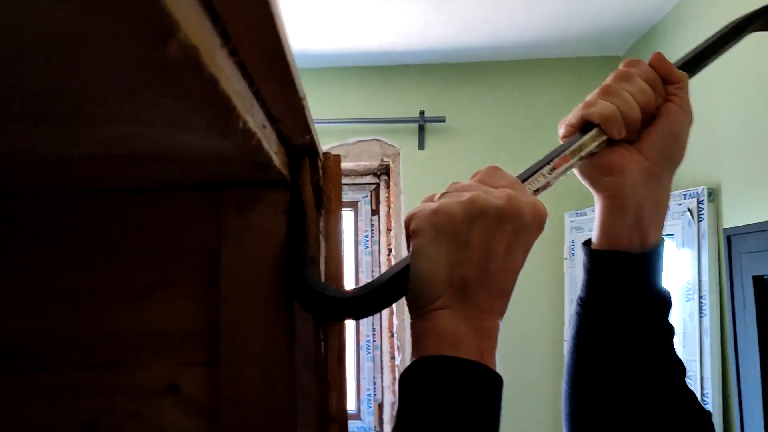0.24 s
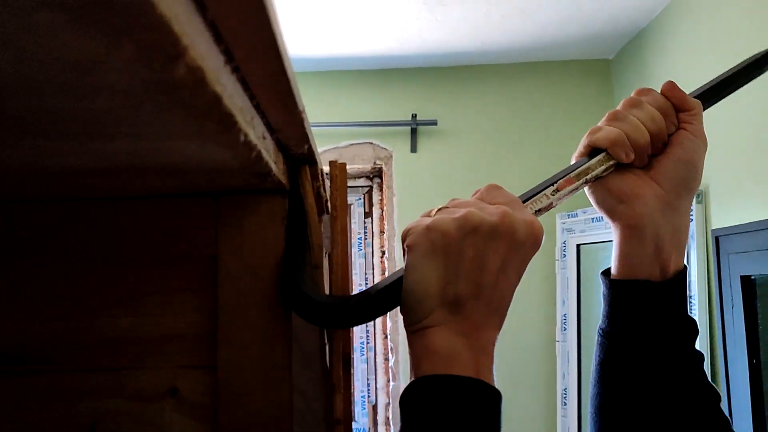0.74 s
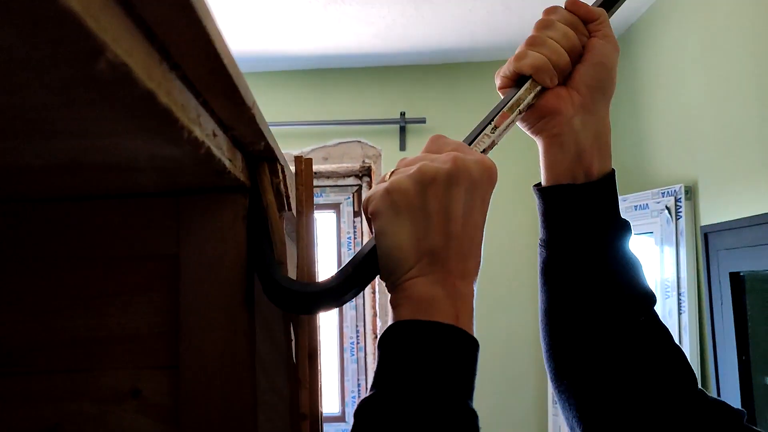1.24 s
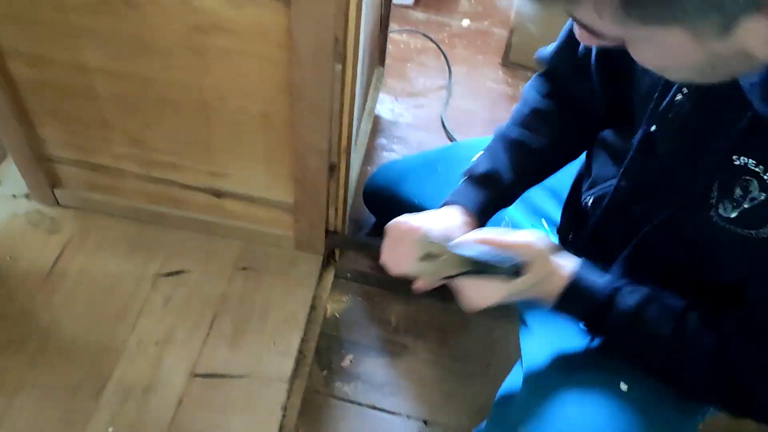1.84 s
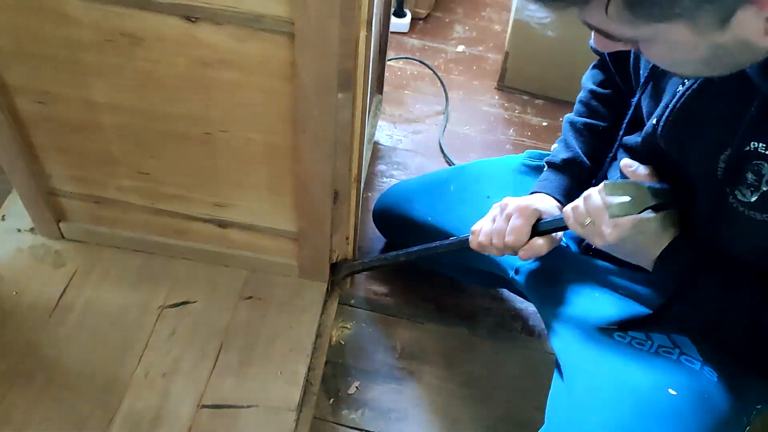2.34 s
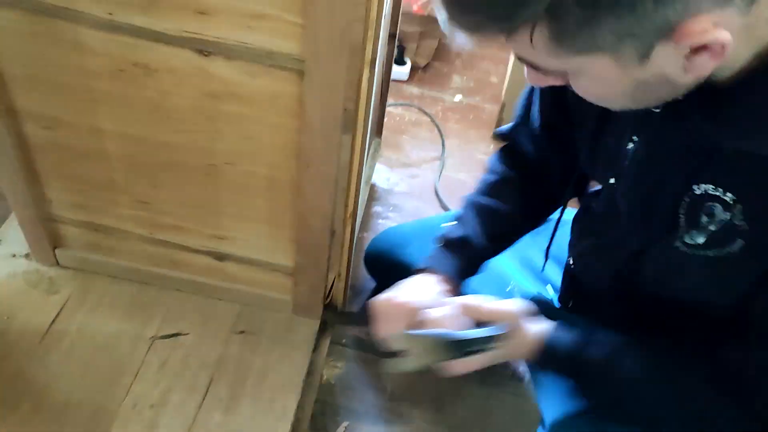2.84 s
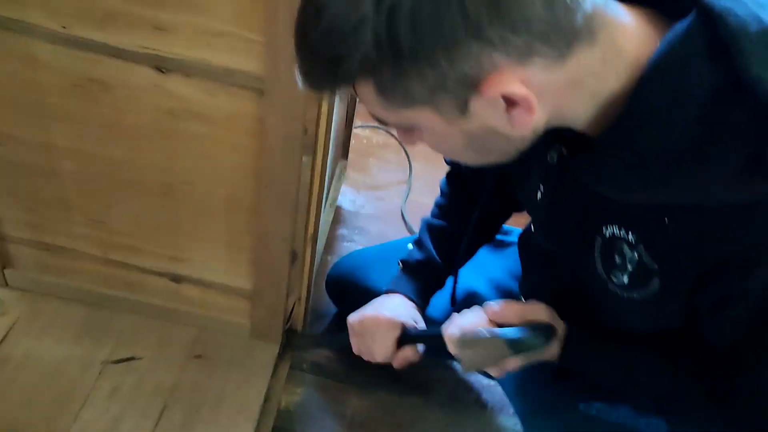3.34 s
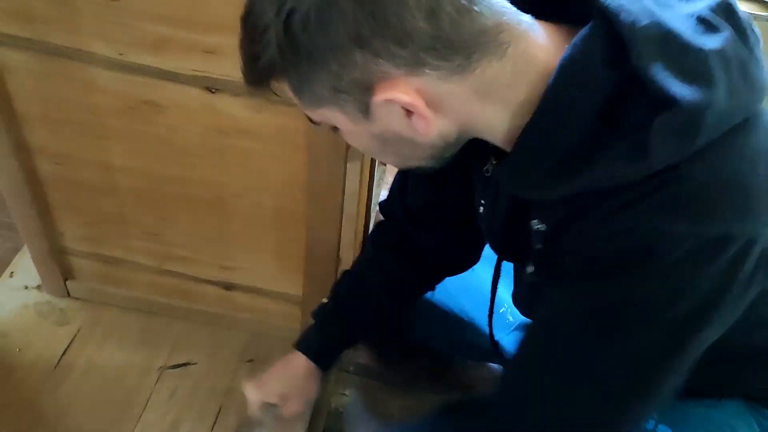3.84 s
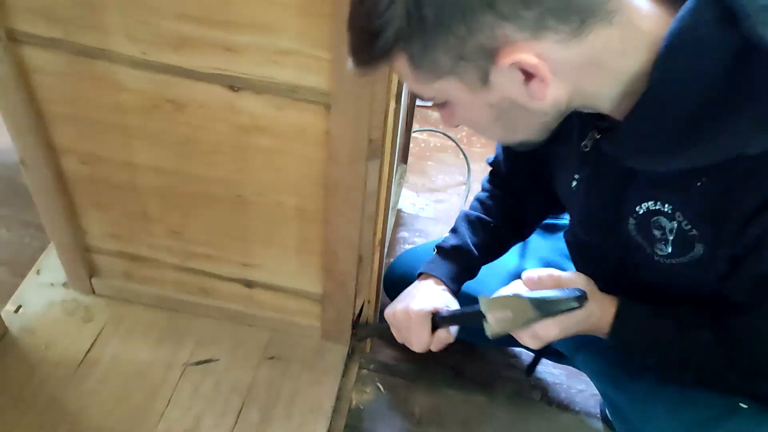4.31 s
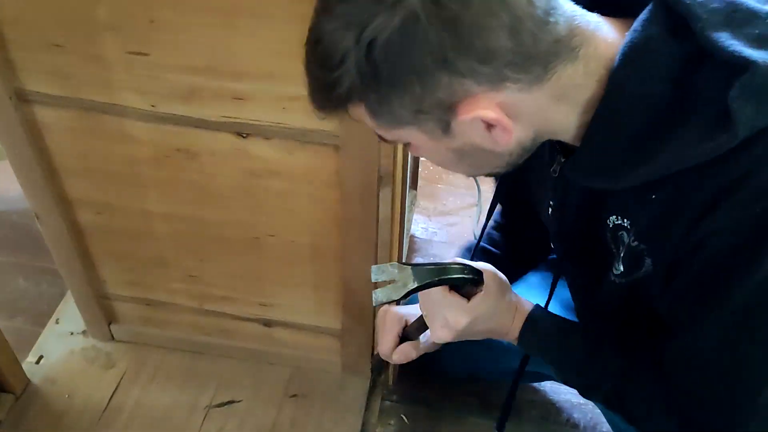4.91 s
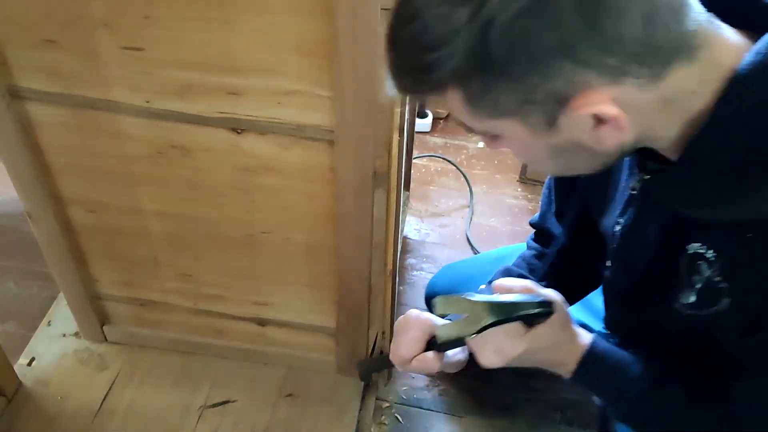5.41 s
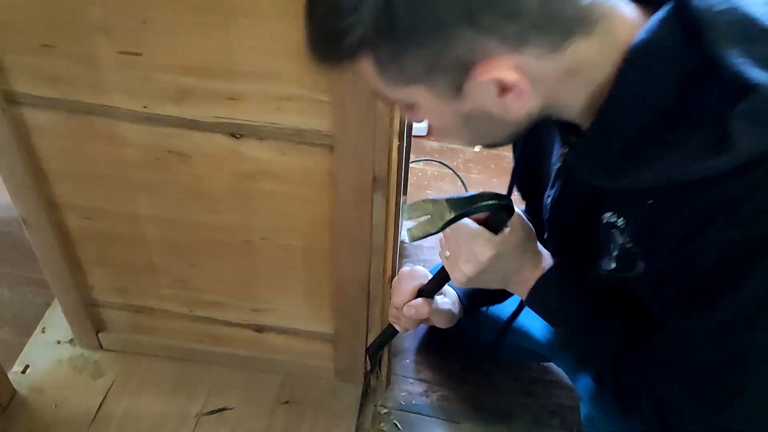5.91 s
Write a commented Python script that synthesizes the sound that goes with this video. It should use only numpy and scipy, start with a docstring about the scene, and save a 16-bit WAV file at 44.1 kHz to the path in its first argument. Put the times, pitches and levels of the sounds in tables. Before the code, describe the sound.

Close stereo pickup in a bare, lightly reverberant room, with faint hush and low handling rumble. A weak tick and a soft scrape at 0.15 s lead to loud, dry wood cracks from 0.3 to 0.8 s, bright and snapping with a short board ring. After a brief gap, a rapid softer creaking volley runs from 1.05 to 1.35 s. A short rasp follows at 1.45 s, then splintering swells into a strong crunch around 1.7 s and another at 2.05 s with a thud. Smaller crunches continue to 2.9 s, fading to sparse faint crackles until a sharp crunch and knock at 3.85 s. Dull knocks come near 4.2 and 4.3 s, with left-side microphone bumps at 4.3 and 4.5 s. A gritty crunch at 4.87 s precedes heavy hollow thuds at 5.17 and 5.43 s, then lighter knocks and scrapes to the end, about 6.1 s.

```python
"""Sharp cracks of an old wardrobe joint in a bare room, two scrapes among them, then mostly crunches and thuds.
A crowbar does the work: noise grains under event envelopes drive wood resonances or take a splinter colour.
Smooth contact pulses ring the carcass as thuds; something brushes the left microphone port.
Hands rumble on the support under a faint hush; decaying noise bands make the room, two ports pick it up."""
import sys
import numpy as np
from scipy import signal
from scipy.fft import rfft, irfft, next_fast_len
from scipy.io import wavfile

SR = 44100
rng = np.random.default_rng(int(sys.argv[2]) if len(sys.argv) > 2 else 0)


def wav_record(signal):
    """Record a signal, one row per channel, as 16-bit PCM in the file named by sys.argv[1]."""
    frames = np.transpose(np.atleast_2d(signal))
    bounded = np.clip(frames, -1, 1)
    # unit amplitude maps onto the largest positive 16-bit level
    quanta = np.round(bounded * 32767).astype(np.int16)
    wavfile.write(sys.argv[1], SR, quanta)


N = 271459

# Thin panel resonances: (frequency [Hz], width [Hz], relative level [dB])
PANEL_MODES = [(165, 35, -8), (267, 14, 2), (350, 25, -7), (440, 54, -2.5), (468, 35, 1), (577, 42, -4),
               (758, 260, -11)]
# Wardrobe carcass resonances: (frequency [Hz], width [Hz], relative level [dB])
CARCASS_MODES = [(117.3, 32, -4.5), (135, 24.8, 1), (163, 43.4, -1.5), (213.3, 49.3, -1), (258, 72.4, -2.5),
                 (350, 114, -8)]
# Spectrum of splintering wood: (frequency [Hz], relative level [dB])
SPLINTER_COLOUR = [(240, -35.5), (400, 9), (569, 7.5), (643, 3), (972, 0.5), (1120, -0.5), (1790, -5),
                   (1910, -6.5), (2550, -6.5), (4350, -13), (7210, -8), (9500, -16.5), (13900, -8),
                   (14600, -29.5), (15500, -85)]


def undb(db):
    """Amplitude ratio of a level in dB."""
    return 10 ** (np.asarray(db) / 20)


def hz_axis(x):
    """FFT bin frequencies, padded by a second and kept off zero."""
    return np.fft.rfftfreq(next_fast_len(x.shape[-1] + SR), 1 / SR) + 1e-3


def through(x, gain):
    """Filter by a frequency response scaled to keep the level of white noise."""
    size = next_fast_len(x.shape[-1] + SR)
    gain = gain / np.sqrt(np.mean(np.abs(gain) ** 2))
    return irfft(rfft(x, size) * gain, size)[..., :x.shape[-1]]


def ring(x, modes):
    """Parallel damped resonances of alternating sign."""
    f = hz_axis(x)
    response = 0
    for k, (hz, width_hz, db) in enumerate(modes):
        damping = 1j * f * width_hz
        response = response + (-1) ** k * undb(db) * damping / (hz ** 2 - f ** 2 + damping)
    return through(x, response)


def colour(x, spectrum, lo_hz=0.94, hi_hz=30000.):
    """Spectrum interpolated over log frequency, with third-order band edges."""
    f = hz_axis(x)
    hz, db = np.transpose(spectrum)
    edge = np.sqrt((1 + (lo_hz / f) ** 6) * (1 + (f / hi_hz) ** 6))
    level_db = np.interp(np.log(f), np.log(np.maximum(hz, 1)), db)
    return through(x, undb(level_db) / edge)


def band(x, lo_hz, hi_hz):
    """Flat spectrum between soft band edges."""
    return colour(x, [(1, 0)], lo_hz, hi_hz)


def bursts(at_s, db, swell_s, t60_s, pan_db, bend):
    """Stereo envelope of swells and fades; powers add, bend shapes the fade; pan_db lifts left, lowers right."""
    power = np.zeros((2, N))
    for t0, level_db, up, down, pan in np.broadcast(at_s, db, swell_s, t60_s, pan_db):
        up, down = max(up, 1 / SR), max(down, .003)
        i = max(int((t0 - .35 * up) * SR), 0)
        t = np.arange(min(int((up + 1.5 * down) * SR), N - i)) / SR
        swell = np.minimum(t / up, 1) ** 2.28
        fade = undb(-120 * (np.maximum(t - up, 0) / down) ** bend)  # as power: 60 dB after t60
        power[:, i:i + len(t)] += swell * fade * undb(2 * level_db + np.array([[pan], [-pan]]))
    return np.sqrt(power)


def grains(rate_hz, spread_db, likeness, lag):
    """Unit-level random clicks of uneven size; the right port gets them lag samples later, partly different."""
    hit = rng.random(N + 200) < rate_hz / SR
    size = hit * undb(spread_db * rng.exponential(size=N + 200))
    a, b = rng.standard_normal((2, N + 200)) * size
    c = np.clip(likeness, 0, 1)
    right = c * a + np.sqrt(1 - c * c) * b
    out = np.array([a[100:N + 100], right[100 - lag:N + 100 - lag]])
    return out / np.sqrt(np.mean(out ** 2))


def room(x, t60_scale):
    """Diffuse tail: octave noise bands, independent at the ports, each with its own decay."""
    # Decay before t60_scale: (frequency [Hz], t60 [s])
    decay = [(150, 0.81), (600, 0.5), (2000, 0.7), (6000, 0.42), (13000, 0.34)]
    hz, t60_s = np.transpose(decay)
    t = np.arange(SR) / SR
    tail = 0
    for f in 125 * 2. ** np.arange(8):
        edges_hz = [f / np.sqrt(2), min(f * np.sqrt(2), .45 * SR)]
        sos = signal.butter(2, edges_hz, "band", fs=SR, output="sos")
        fade = undb(-60 * t / (t60_scale * np.interp(np.log(f), np.log(hz), t60_s)))
        tail = tail + signal.sosfilt(sos, rng.standard_normal((2, SR))) * fade
    tail = tail * np.minimum(t / 0.0047, 1)  # onset [s]
    tail = tail / np.sqrt(np.sum(tail ** 2, 1, keepdims=True))
    return signal.fftconvolve(x, tail, axes=1)[:, :N]


def house():
    """Low support resonances, jolted by the hands, and a hush highest while the joint is under load."""
    # Hand jolts: (time [s], level [dB])
    jolt_table = [(.19, -33), (.63, -46.5), (.78, -44), (0.959, -41.5), (1.12, -41.5), (1.32, -46),
                  (1.82, -40), (2.04, -40.5), (2.189, -43.5), (2.4, -52.5), (2.71, -34), (3.5, -54.5),
                  (3.88, -50), (4.01, -50), (4.26, -34.5), (4.509, -42.5), (5.19, -36.5), (5.411, -40),
                  (5.6, -51), (5.9, -53), (6.11, -44)]
    # Hush spectrum: (frequency [Hz], relative level [dB])
    hush_colour = [(53, -36), (90, -4.5), (259, -1.5), (494, -10.5), (1920, -20), (2230, -22), (4640, -26),
                   (7290, -24.5), (9650, -41), (13600, -40), (15500, -64.5)]
    # Hush envelope: (time [s], level [dB])
    hush_level = [(0, -34), (.14, -56), (0.221, -43.5), (0.492, -43.5), (0.669, -38), (.85, -40),
                  (.99, -58.5), (1.11, -46.5), (1.2, -36), (1.35, -37.5), (1.62, -56.5), (1.9, -68.5),
                  (2.599, -53.5), (3.0, -57), (3.77, -73.5), (4.05, -65), (5.798, -66.5), (6.16, -70)]
    rest_db, swell_s, t60_s = -59, 0.022, 0.46
    support_modes = [(31.0, 15.0, -1.0), (52.5, 28.2, -1.0), (72.6, 25, -4)]  # (Hz, width Hz, dB)
    rumble = ring(grains(SR, 0, 0.4, lag=0), support_modes)
    jolts = bursts(*np.transpose(jolt_table), swell_s, t60_s, 0, 0.94)
    hush = colour(grains(15000, 0.44, 0.35, lag=0), hush_colour)
    hush_db = np.interp(np.arange(N) / SR, *np.transpose(hush_level))
    return rumble * (undb(rest_db) + jolts) + hush * undb(hush_db)


def touches():
    """Air is sucked out of the left port and pressed back, with a dry scratch; the right barely hears it."""
    # Brushes: (time [s], push level [dB], push length [s], scratch level [dB], scratch top [Hz])
    touch_table = [(4.275, -19.5, 0.012, -26, 3600), (4.473, -29.5, 0.0069, -48.5, 3020),
                   (4.531, -14.5, 0.0097, -32, 1080)]
    out = np.zeros(N)
    for at_s, push_db, length_s, scratch_db, top_hz in touch_table:
        u = np.arange(int(1.6 * length_s * SR)) / (length_s * SR)
        push = -np.sin(2 * np.pi * np.minimum(u, 1) ** 0.576) * np.minimum(u / 0.14, 1) ** 2
        scratch = band(rng.standard_normal(SR // 10), 193, 2 * top_hz)[:len(u)]
        scratch = band(scratch, 1, top_hz) * np.minimum(u / 0.24, 1) * undb(-14 * u)
        scratch = scratch / np.std(scratch)
        out[int(at_s * SR):][:len(u)] += undb(push_db) * push + undb(scratch_db) * scratch
    return out * undb([[0], [-24]])


def thuds():
    """A smooth push as long as the contact rings the carcass; the landing spot tilts its modes."""
    # Blunt blows: (time [s], peak level [dB], contact [s], tilt above first mode [dB per octave])
    thud_table = [(2.064, -29, 0.002, -7), (2.739, -33.5, 0.0031, 5), (3.865, -22.5, 0.0043, 13),
                  (4.161, -24.5, 0.0016, -2.2), (4.182, -30, 0.0064, -3), (4.327, -28, 0.0036, -2),
                  (5.174, -16.5, 0.0033, 11), (5.431, -13.5, 0.0041, 3), (5.614, -31.5, 0.00345, -2.5),
                  (5.628, -27, 0.0052, -0.5), (5.898, -46, 0.004, 8), (6.118, -31, 0.0041, -3)]
    out = np.zeros(N + SR)
    t = np.arange(SR // 4) / SR
    first_hz = CARCASS_MODES[0][0]
    for at_s, peak_db, contact_s, tilt_db in thud_table:
        modes = [(hz, width_hz, db + tilt_db * np.log2(hz / first_hz)) for hz, width_hz, db in CARCASS_MODES]
        push = -np.sin(np.pi * np.minimum(t / contact_s, 1)) ** 2
        blow = ring(push, modes)
        out[int(at_s * SR):][:len(t)] += undb(peak_db) * blow / np.abs(blow).max()
    return out[:N]


def crunches():
    """Bar driven in and levered: dense splintering grains over ringing panel and booming carcass, plus thuds."""
    # Bar in the wood; layers scale the last two:
    # (time [s], splinter level [dB], board level [dB], boom level [dB], swell [s], fade t60 [s])
    crunch_table = [(0.0014, -47, -41, -45, 0.013, .17), (0.1377, -40.5, -39.5, -41.5, 0.021, 0.47),
                    (1.458, -47, -43, -53, 0.011, 0.5), (1.667, -27.5, -37.5, -35, 0.003, 0.42),
                    (1.7255, -21, -36, -39, 0.0035, 0.26), (1.748, -17, -25, -29, 0.032, 0.16),
                    (1.949, -55.5, -74, -55.5, 0.016, 0.16), (1.9897, -56.5, -77, -54, 0.017, .14),
                    (2.0234, -26, -37.5, -35, 0.032, 0.34), (2.059, -15.5, -21, -26.5, 0.018, 0.2),
                    (2.174, -38.5, -52.5, -38, 0.012, 0.45), (2.2157, -31.5, -41.5, -43.5, 0.02, 0.19),
                    (2.3327, -28.5, -32.5, -36, .015, 0.27), (2.419, -41, -66, -49.5, 0.0058, 0.15),
                    (2.5093, -29, -37, -29.5, .027, 0.49), (2.574, -28.5, -37, -39, 0.044, 0.33),
                    (2.628, -29.5, -57, -49, 0.0079, 0.17), (2.6794, -46.5, -51.5, -45, .012, 0.69),
                    (2.734, -39, -43, -30.5, 0.0077, 0.3), (2.818, -38, -48.5, -47.5, 0.017, 0.24),
                    (2.938, -40, -48, -42.5, 0.035, 0.3), (3.029, -51, -54, -66, 0.0068, 0.11),
                    (3.09, -57.5, -58.5, -50, .02, 0.42), (3.168, -50, -54.5, -72, 0.022, 0.2),
                    (3.3554, -60.5, -68, -49, 0.014, 0.4), (3.455, -61.5, -88, -79, 0.028, 0.34),
                    (3.514, -59.5, -59.5, -50, 0.0089, 0.18), (3.564, -50, -53, -45, 0.0041, 0.36),
                    (3.638, -46.5, -58, -52, 0.033, 0.2), (3.69, -67, -55, -44, 0.013, 0.21),
                    (3.8322, -35.5, -47, -38, 0.032, 0.1), (3.856, -20, -22.5, -33, 0.023, 0.22),
                    (3.9275, -37.5, -44, -40.5, 0.0048, 0.32), (4.008, -46, -47.5, -48, 0.022, 0.26),
                    (4.1582, -82.5, -60, -29, 0.01, 0.13), (4.1837, -55.5, -46.5, -27.5, 0.0087, 0.19),
                    (4.3214, -46.5, -42, -34.5, 0.026, .18), (4.4303, -73.5, -83, -60, 0.015, 0.29),
                    (4.5314, -46.5, -59, -42.5, 0.014, 0.59), (4.5804, -42.5, -41.5, -39, 0.022, 0.39),
                    (4.679, -43.5, -86, -52, 0.0074, .15), (4.811, -48, -79, -57, 0.071, 0.72),
                    (4.8695, -30.5, -40.5, -39.5, 0.018, 0.16), (4.9817, -76, -77, -47.5, 0.0061, .099),
                    (5.1431, -33, -37, -24.5, 0.025, 0.41), (5.164, -23, -26, -23, 0.033, 0.22),
                    (5.25, -33, -39, -52.5, 0.0062, 0.18), (5.307, -45, -50, -39.5, 0.034, 0.28),
                    (5.4272, -46, -28.5, -21.5, 0.0034, 0.19), (5.486, -48, -43.5, -31.5, 0.0098, 0.31),
                    (5.6009, -69, -41.5, -28, 0.026, 0.29), (5.7428, -55.5, -51, -48.5, 0.0076, 0.24),
                    (5.896, -45, -48.5, -38, 0.027, 0.35), (5.9634, -44, -53, -42, 0.035, 0.38),
                    (6.0396, -45.5, -48, -34.5, 0.019, 0.33), (6.115, -65, -52, -33.5, 0.0062, .29)]
    at_s, grit_db, board_db, boom_db, swell_s, t60_s = np.transpose(crunch_table)
    pan_db = -0.5
    loudest_db = grit_db.max()
    dust_db = .85 * (grit_db - loudest_db) + loudest_db - 22  # faint crunches are relatively dustier
    crush = grains(15000, 1.3, 0.23, lag=int(.0003 * SR))
    grit = crush * bursts(at_s, grit_db, swell_s, t60_s, pan_db, 0.77)
    grit = colour(grit, SPLINTER_COLOUR, 1900, 8160)
    board = crush * bursts(at_s, board_db, swell_s, 0.79 * t60_s, pan_db, 1.0)
    board = colour(board, SPLINTER_COLOUR, 390, 1600)
    dust = crush * bursts(at_s, dust_db, swell_s, 0.34 * t60_s, pan_db, 0.59)
    dust = colour(dust, SPLINTER_COLOUR, 13000)
    shove = grains(3000, 0.35, 0.44, lag=0)
    boom = shove * bursts(at_s, boom_db, 0.69 * swell_s, 0.9 * t60_s, 0.35 * pan_db, 0.91)
    boom = ring(boom, CARCASS_MODES)
    panel = crush * bursts(at_s, board_db - 9, swell_s, t60_s, 0.42 * pan_db, 0.79)
    panel = ring(panel, PANEL_MODES)
    direct = grit + board + dust + boom + panel + thuds()
    return direct + undb(-15.0) * room(direct, 0.36)


def scrapes(port_lag):
    """The bar slides along the board: dense uneven grains through one broad rasp resonance."""
    # Slides: (time [s], level [dB], swell [s], fade t60 [s])
    scrape_table = [(0.14, -36, 0.046, 0.33), (1.454, -35.5, 0.017, 0.42)]
    rasp_hz, rasp_width_hz = 1950, 940
    at_s, db, swell_s, t60_s = np.transpose(scrape_table)
    slide = grains(15000, 1.4, 0.43, lag=port_lag)
    slide = slide * bursts(at_s, db, swell_s, t60_s, -1.3, 0.67)
    return band(ring(slide, [(rasp_hz, rasp_width_hz, 0)]), 1, 10000)


def cracks():
    """Each slip tears fibres for a few ms; board and panel take a longer push and ring."""
    # Joint slips, before layer gains: (time [s], snap level [dB], wood level [dB])
    crack_table = [(0.0196, -28, -34), (0.151, -32.5, -30.5), (0.28, -52.5, -43.5), (0.3065, -15, -23),
                   (0.4331, -12.5, -18.5), (0.444, -17, -34.5), (0.4663, -14, -22.5), (0.5575, -13.5, -20),
                   (0.5957, -12.5, -18.5), (0.622, -16.5, -22.5), (0.6375, -14, -26.5), (0.666, -16.5, -22),
                   (0.7113, -21, -23), (0.7912, -14, -22.5), (1.0123, -47, -53), (1.0762, -24, -28.5),
                   (1.088, -21, -26.5), (1.1028, -24, -32.5), (1.13, -22.5, -27.5), (1.1514, -18.5, -33),
                   (1.1823, -20.5, -29), (1.1926, -22.5, -28.5), (1.2032, -24, -29.5), (1.2128, -23, -27.5),
                   (1.231, -22, -37), (1.242, -22.5, -28), (1.2551, -22, -35.5), (1.2652, -24.5, -31),
                   (1.275, -30, -38.5), (1.294, -23.5, -34), (1.3414, -24, -31), (1.6127, -41.5, -48.5),
                   (1.633, -36.5, -41)]
    # Snap resonances: (frequency [Hz], width [Hz], relative level [dB])
    snap_modes = [(4590, 720, -5), (5620, 550, 2), (6760, 250, 0.5), (7610, 430, 5.5), (9260, 520, -3),
                  (9770, 1100, -9), (12100, 700, -2.5), (13200, 510, -0.5), (14500, 700, -18)]
    # Board resonances: (frequency [Hz], width [Hz], relative level [dB])
    board_modes = [(1172, 88, 3), (1500, 700, -4), (1600, 120, -2.5), (2050, 150, 0), (2560, 160, 2),
                   (2990, 270, 0), (3730, 780, -7.5)]
    at_s, snap_db, wood_db = np.transpose(crack_table)
    treble_db = snap_db + .8 * (snap_db - snap_db.max())  # weaker slips are duller
    port_lag = int(.00048 * SR)
    tear = grains(40000, 0.77, 0.66, lag=port_lag)

    def tick(db, lo_hz, hi_hz):
        """One band of the snap ringing."""
        return band(ring(tear * bursts(at_s, db, 0.002, 0.012, -1.4, 1.2), snap_modes), lo_hz, hi_hz)

    snap = undb(-3.0) * tick(snap_db, 0.92, 9300) + undb(-6.5) * tick(treble_db, 10000, 20000)
    board = ring(tear * bursts(at_s, wood_db, 0.0017, 0.039, -0.45, 0.89), board_modes)
    board = board + scrapes(port_lag)
    fibres = tear * bursts(at_s, snap_db, 0.002, 0.012, -1.2, 1.3)
    fibres = colour(fibres, SPLINTER_COLOUR, 3300, 14000)  # heard only off the walls
    panel = ring(tear * bursts(at_s, wood_db - 2.5, 0.0013, 0.048, .3, 1), PANEL_MODES)
    to_room = undb(-11) * snap + undb(-17) * fibres + undb(-4.5) * board + undb(-1.5) * panel
    return snap + board + panel + room(to_room, 0.79)


def scene():
    """Sum of joint, bar, port brushes and background."""
    return cracks() + crunches() + touches() + house()


def record(dry):
    """The two ports favour different bands; peaks are rounded and the top is cut."""
    # Port imbalance: (frequency [Hz], left minus right [dB])
    port_table = [(60, 1), (110, -1), (200, 2), (380, 0.5), (700, 2.5), (1290, 0), (2380, -3), (4400, -7),
                  (8120, -3), (15000, 0)]
    top_hz, ceiling = 16300, 0.57
    hz, db = np.transpose(port_table)
    tilt = undb(np.interp(hz_axis(dry), hz, db) / 2)
    size = next_fast_len(N + SR)
    ports = irfft(rfft(dry, size) * np.array([tilt, 1 / tilt]), size)[:, :N]
    rounded = ceiling * np.tanh(ports / ceiling)
    return signal.sosfilt(signal.ellip(10, .2, 80, top_hz, fs=SR, output="sos"), rounded)


dry = scene()
out = record(dry)
wav_record(out)
```